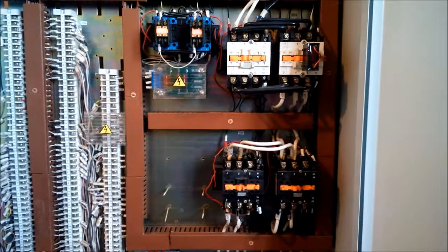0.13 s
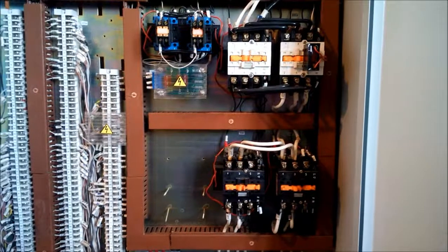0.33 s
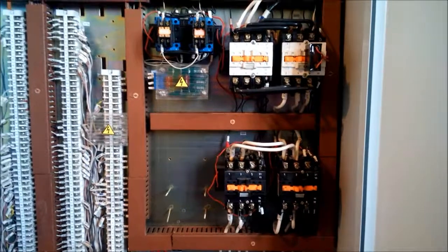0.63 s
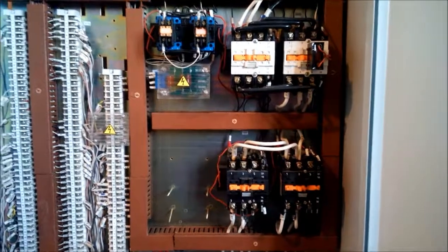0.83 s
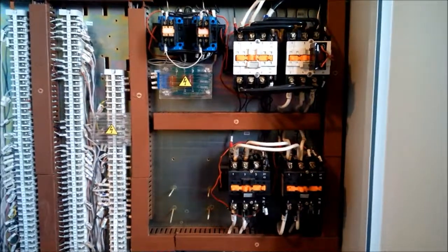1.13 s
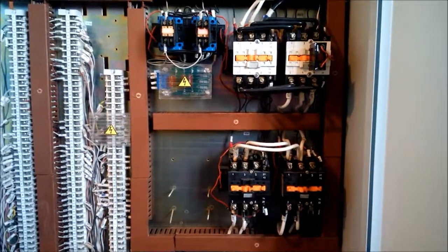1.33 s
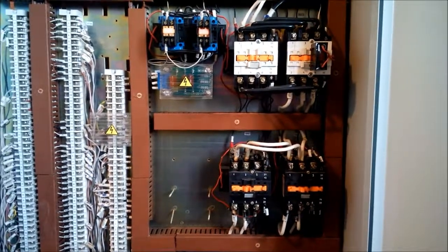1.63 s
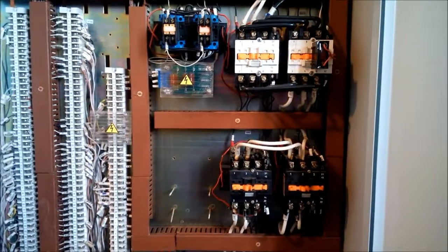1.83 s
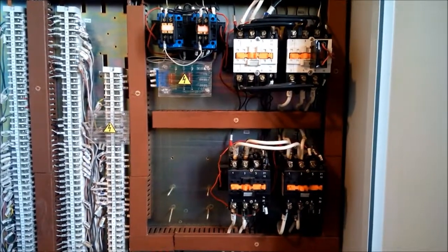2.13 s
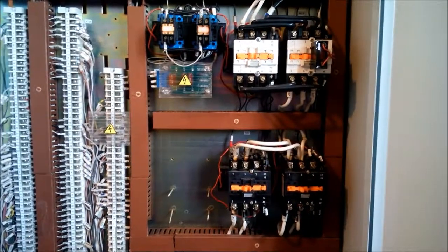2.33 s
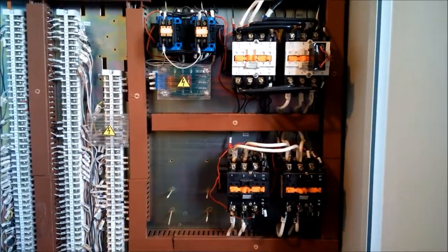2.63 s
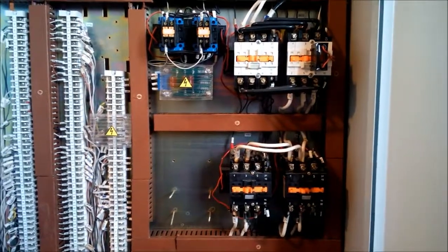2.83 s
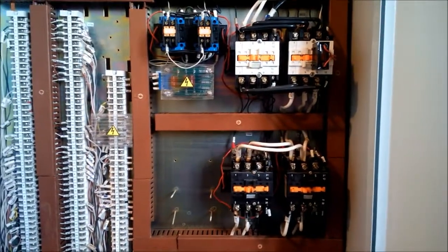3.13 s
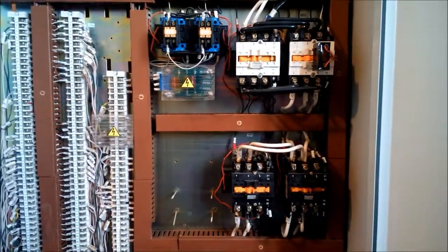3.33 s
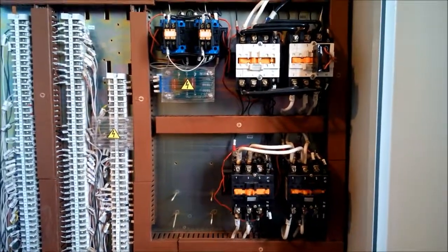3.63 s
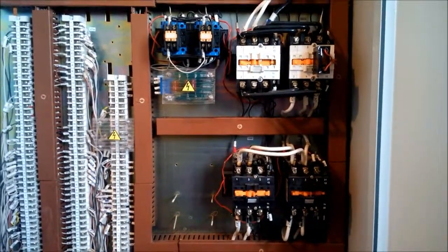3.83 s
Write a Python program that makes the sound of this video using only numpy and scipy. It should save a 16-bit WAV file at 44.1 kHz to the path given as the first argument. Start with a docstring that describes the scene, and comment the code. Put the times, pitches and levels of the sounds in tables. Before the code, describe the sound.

Contactor clacks in an electrical cabinet: one single crack, then a squeak and heavier booming slam, followed at once by ringing steel brake clatter and a growling motor, in a hard, echoing room, mono microphone.

```python
"""The last of an earlier clack's echo dies away over a wavering hum, in a bare lift machine room.
One contactor clacks in the control cabinet; a second squeaks, slams in and sets the panel booming.
The brake lifts with a ringing steel clatter, its lining rubs, and the hoist motor starts to growl.
Tones and fan noise make the hum; impulses shape noise into cracks, panel modes and wall echo;
throbbing noise drives the motor's resonances."""
import sys
import numpy as np
from scipy import signal
from scipy.fft import rfft, irfft
from scipy.io import wavfile
from scipy.ndimage import uniform_filter1d

SR = 44100
rng = np.random.default_rng(int(sys.argv[2]) if len(sys.argv) > 2 else 0)


def to_wav(s):
    """Save 16-bit WAV."""
    ch = np.atleast_2d(s).T  # columns
    pcm = np.round(np.clip(ch, -1, 1) * 32767)  # PCM
    wavfile.write(sys.argv[1], SR, pcm.astype(np.int16))


N = 176400  # samples: four seconds
T = np.arange(N) / SR  # time [s]


def undb(db):
    """Turns decibels into an amplitude factor."""
    return 10 ** (np.asarray(db) / 20)


def unit(x):
    """Scales to rms 1, for sounds that last."""
    return x / np.sqrt(np.mean(x ** 2))


def norm(x):
    """Scales to energy 1, for sounds that die away."""
    return x / np.sqrt(np.sum(x ** 2))


def noise():
    """White noise for the whole scene."""
    return rng.standard_normal(N)


def curve(rows):
    """Draws straight lines through the (t, level) rows of a table."""
    return np.interp(T, *np.array(rows).T)


def lookup(rows, hz):
    """Reads a table on a log-frequency axis."""
    f, v = np.array(rows).T
    return np.interp(np.log(np.maximum(hz, 1)), np.log(f), v)


def conv(a, b):
    """Convolves, cut to the scene's length."""
    return signal.fftconvolve(a, b)[:N]


def colour(x, rows):
    """Filters to a spectrum, with minimum phase so that nothing sounds before its blow."""
    size = 2 ** 13
    hz = np.arange(size // 2 + 1) * SR / size
    cepstrum = irfft(np.log(undb(lookup(rows, hz))))
    # Folding the cepstrum onto positive times makes the filter causal
    cepstrum[1:size // 2] *= 2
    cepstrum[size // 2 + 1:] = 0
    return conv(x, irfft(np.exp(rfft(cepstrum))))


def fade(t60):
    """Exponential decay by 60 dB in t60 seconds."""
    return np.exp(-np.log(1000) * T / t60)


def resonate(x, rows):
    """Drives parallel resonances, (f/Hz, width/Hz, level/dB), with alternating signs."""
    out = 0
    for k, (hz, width, db) in enumerate(rows):
        b, a = signal.iirpeak(hz, hz / width, fs=SR)
        out = out + (-1) ** k * undb(db) * signal.lfilter(b, a, x)
    return out


def walk(rate):
    """Slow random wander, rms 1, with a new target rate times a second."""
    k = int(SR / rate)
    steps = np.repeat(rng.standard_normal(N // k + 1), k)
    smooth = uniform_filter1d(uniform_filter1d(steps, k), k)
    return unit(smooth[:N])


def blows(rows):
    """One impulse for each blow, (t/s, level/dB)."""
    out = np.zeros(N)
    for s, db in rows:
        out[int(s * SR)] += undb(db)
    return out


def ringing(hits, t60, build_s):
    """Amplitude envelope of blows whose energies build up, add and die away."""
    keep = np.exp(-2 * np.log(1000) / (t60 * SR))
    lag = np.exp(-1 / (build_s * SR))
    energy = signal.lfilter([1], [1, -keep], hits ** 2 + 1e-20)
    return np.sqrt(signal.lfilter([1 - lag], [1, -lag], energy))


def crack(hits, spectrum, t60, rise_s=0.00093):
    """The dense, short ring of the struck parts themselves."""
    return norm(colour(noise() * ringing(hits, t60, rise_s), spectrum))


# Reverberation time of the bare room: columns f/Hz [Hz], t60/s [s]
REVERB_TIME = [(100, .9), (300, 1.85), (700, 1.3), (1500, 1.7), (2800, 1.51), (5400, 1.0), (8000, 0.79),
               (11000, 0.55), (16000, .44)]


def room(hits, build_s):
    """Diffuse echo of the hard walls: noise in bands, the treble dying before the middle."""
    spectrum = rfft(noise())
    hz = np.arange(N // 2 + 1) * SR / N
    out = 0
    for k, (_, t60) in enumerate(REVERB_TIME):
        # Each band fades into its neighbours
        band = [(row[0], float(j == k)) for j, row in enumerate(REVERB_TIME)]
        out = out + irfft(spectrum * lookup(band, hz), N) * ringing(hits, t60, build_s)
    return norm(out)


def wavering_tone(hz, drift):
    """Sine of rms 1 whose pitch wanders by the fraction drift."""
    wandering_hz = hz * (1 + drift * walk(5.98))
    return np.sqrt(2) * np.sin(2 * np.pi * np.cumsum(wandering_hz) / SR)


# Course of the hum, before its random waver: columns t/s [s], level/dB [dB]
HUM_COURSE = [(0, -38), (.33, -37), (.5, -46), (.72, -45), (1.03, -49.5), (1.19, -34.5), (1.44, -40),
              (1.62, -36), (1.69, -40.5), (1.745, -58), (1.8, -42.5), (1.9, -33.5), (2.15, -36), (2.4, -33),
              (2.9, -34), (3.2, -37), (3.29, -40), (3.8, -45), (4, -29)]
# Relative spectrum of the fan noise: columns f/Hz [Hz], level/dB [dB per Hz]
FAN_SPECTRUM = [(25, -47), (35, -9.5), (44, -14), (60, -24), (90, -6), (160, -1.5), (270, -2.5),
                (400, -4.5), (520, -13), (700, -20), (1200, -27.5), (2500, -33.5), (6000, -37.5),
                (11000, -38), (12000, -41), (15800, -39.5)]


def machinery():
    """Background: two low tones and a fluttering narrow band waver over steady fan noise."""
    hum_hz, shaft_hz = 113.46, 68.7
    shaft_db, flutter_db, fan_db = -49, -45.5, -49
    hum = wavering_tone(hum_hz, drift=0.0049) * undb(curve(HUM_COURSE) + 1.9 * walk(7.1))
    shaft = wavering_tone(shaft_hz, drift=0.0045) * undb(shaft_db + 0.93 * walk(1.1))
    band = [(115.2, 31, 0)]  # f/Hz, width/Hz, level/dB
    flutter = unit(resonate(resonate(noise(), band), band))
    fan = unit(colour(noise(), FAN_SPECTRUM))
    return hum + shaft + undb(flutter_db) * flutter + undb(fan_db) * fan


# Relative spectrum of the earlier clack's echo: columns f/Hz [Hz], level/dB [dB per Hz]
OLD_ECHO_SPECTRUM = [(150, -7), (400, 0), (1000, -6), (1600, -9), (3000, -18), (5500, -18), (8000, -29),
                     (15800, -44)]


def dying_echo(echo_db=-18.5):
    """The last of an earlier clack's echo fades off the walls at the start."""
    echo = room(blows([(0, 0)]), build_s=.001)
    return undb(echo_db) * norm(colour(echo, OLD_ECHO_SPECTRUM))


# Resonances of the motor and its bed: columns f/Hz [Hz], width/Hz [Hz], level/dB [dB]
MOTOR_MODES = [(166, 20, -3.5), (193.4, 7.7, 6), (258.6, 33, -2.5), (279.8, 7.9, 6), (326.6, 10, 3),
               (379.6, 12, -1), (450, 29, -0.5), (518, 25, -4)]
# Relative spectrum of the force that drives them: columns f/Hz [Hz], level/dB [dB per Hz]
DRIVE_SPECTRUM = [(50, -25.5), (150, 0), (520, 0.5), (1200, -13.5), (5000, -30)]
# Relative course of the growl: columns t/s [s], level/dB [dB]
EFFORT_COURSE = [(3.35, -64), (3.52, -1), (3.66, -6), (3.78, 3.5), (3.9, 3.5), (4, 4)]
# Relative spectrum of the rush of gears: columns f/Hz [Hz], level/dB [dB per Hz]
RUSH_SPECTRUM = [(30, -10), (60, -16), (200, -8), (450, -3.5), (750, -3), (1000, -6.5), (1600, -10.5),
                 (2300, -20), (4500, -19.5), (10500, -23.5), (12000, -35), (15800, -39)]


def motor(growl_db=-28, rush_db=-34.0, throb_db=3, rush_fall_db_per_s=5):
    """The starting motor throbs through its bed and brightens, with a smooth rush of gears."""
    throb_hz, split_hz = 43.25, 400
    brighten_db_per_s, pivot_s = 33.5, 3.99  # no gain or loss at the pivot
    gears_start_s, gears_rise_s = 3.48, 0.092

    throb_phase = 2 * np.pi * np.cumsum(throb_hz * (1 + 0.0416 * walk(15))) / SR
    throb = undb(throb_db * np.cos(throb_phase))
    drive = colour(noise() * throb, DRIVE_SPECTRUM)
    low = resonate(drive, [row for row in MOTOR_MODES if row[0] < split_hz])
    high = resonate(drive, [row for row in MOTOR_MODES if row[0] >= split_hz])
    # The upper resonances gain as the motor gathers speed
    brightening = undb(brighten_db_per_s * (T - pivot_s))
    growl = (low + high * brightening) / np.std(low + high) * undb(curve(EFFORT_COURSE))

    gears_in = np.clip((T - gears_start_s) / gears_rise_s, 0, 1)
    running = gears_in * undb(-rush_fall_db_per_s * (T - pivot_s))
    rush = running * unit(colour(noise(), RUSH_SPECTRUM))
    return undb(growl_db) * growl + undb(rush_db) * rush


# The rub until the lining clears the drum, before its flicker: columns t/s [s], level/dB [dB]
RUB_COURSE = [(3.5, -90), (3.62, -58), (3.76, -34.5), (3.86, -42.5), (4, -56)]
# Resonances that the rubbing excites: columns f/Hz [Hz], width/Hz [Hz], level/dB [dB]
RUBBED_MODES = [(1550, 270, 2), (3370, 55, -10), (6000, 210, -3), (7100, 120, -1), (9570, 47, -6),
                (10500, 260, -9.5)]


def lining():
    """The lining drags on the turning drum: noise keeps the steel singing."""
    return unit(resonate(noise(), RUBBED_MODES)) * undb(curve(RUB_COURSE) + 1.7 * walk(40))


# Blows of the brake's steel parts: columns t/s [s], level/dB [dB]
CLATTER_BLOWS = [(3.4738, 3.5), (3.4768, 4), (3.4805, -10), (3.487, 2), (3.4915, -8), (3.498, -2),
                 (3.5045, 0), (3.516, -10), (3.524, -2), (3.55, -9), (3.587, -21)]
# Relative spectrum of their direct crack: columns f/Hz [Hz], level/dB [dB per Hz]
CLATTER_CRACK = [(100, -15), (300, 6.5), (900, -15.5), (1300, -3), (1600, 5.5), (2200, -8.5), (3200, -9),
                 (4200, -13), (5800, -4.5), (7000, -11.5), (9400, 1), (10800, -6.5), (12000, -21),
                 (15800, -19)]
# Relative spectrum of their echo: columns f/Hz [Hz], level/dB [dB per Hz]
CLATTER_ECHO = [(100, -23), (170, 0.5), (300, -0.5), (420, -7.5), (600, -9.5), (900, -9), (1200, -5),
                (1650, -9), (2200, -11.5), (3200, -14.5), (4200, -15.5), (5800, -13), (7000, -14),
                (9400, -6), (10800, -13.5), (12000, -22), (15800, -26)]
# Resonances of the brake's steel: columns f/Hz [Hz], width/Hz [Hz], level/dB [dB]
STEEL_MODES = [(892, 43, -4.5), (1490, 125, -4), (1697, 97, -1.5), (3310, 45, -8), (4860, 43, -8),
               (5860, 180, -4), (7040, 42, -11), (7900, 260, -11), (9430, 76, 1.5), (10700, 150, -19)]
# The brake arms reach their stops: columns t/s [s], level/dB [dB]
ARM_STOPS = [(3.506, -2.5), (3.525, -5), (3.551, -3.5), (3.571, -9), (3.615, -3.5)]
# Relative spectrum of those thuds: columns f/Hz [Hz], level/dB [dB per Hz]
THUD_SPECTRUM = [(30, -10), (70, -12), (180, 6), (300, 5.5), (450, 4.5), (650, 0.5), (1000, -6.5),
                 (1500, -2), (2500, -9), (6000, -47), (15800, -52)]


def brake(crack_db=13, clatter_db=15.5, ring_db=13.0, thud_db=8.0):
    """Steel parts clatter and thud across the room, and ring on in its echo."""
    hits = blows(CLATTER_BLOWS)
    direct = crack(hits, CLATTER_CRACK, t60=0.099)
    thuds = crack(blows(ARM_STOPS), THUD_SPECTRUM, t60=0.085)
    clatter = norm(colour(room(hits, build_s=0.0034), CLATTER_ECHO))
    ring = norm(resonate(room(hits, build_s=0.0017), STEEL_MODES))
    near = undb(crack_db) * direct + undb(thud_db) * thuds
    return near + undb(clatter_db) * clatter + undb(ring_db) * ring


# The armature catches as it slides in: columns t/s [s], level/dB [dB]
CATCHES = [(3.302, -7), (3.3155, -5)]
# Resonance of the squeak: columns f/Hz [Hz], width/Hz [Hz], level/dB [dB]
SQUEAK_MODE = [(1530, 130, 0)]
# Relative spectrum of the scrape: columns f/Hz [Hz], level/dB [dB per Hz]
SCRAPE_SPECTRUM = [(300, -9), (2000, -6), (10000, -4), (13000, -11)]


def armature(squeak_db=-3, scrape_db=-12):
    """A short squeak and scrape of noise as the main contactor's armature slides in."""
    slide = ringing(blows(CATCHES), t60=.06, build_s=0.0035)
    squeak = resonate(resonate(noise(), SQUEAK_MODE), SQUEAK_MODE) * slide
    scrape = colour(noise() * slide, SCRAPE_SPECTRUM)
    return undb(squeak_db) * norm(squeak) + undb(scrape_db) * norm(scrape)


# Modes of the cabinet panel and frame: columns f/Hz [Hz], level/dB [dB], t60/s [s]
PANEL_MODES = [(194, -0.5, 0.79), (235, -19, 1), (339, -17, 1), (366.7, -16.5, .6), (407, -20, .5),
               (473, -19, 1), (1640, -15.5, 0.4), (3332, -20, 0.83)]


def contactor(rows, spectrum, echo, crack_t60, crack_db, room_db, panel_db):
    """Each blow cracks in the plastic housing; the hardest rings the panel; the room answers."""
    hits = blows(rows)
    direct = crack(hits, spectrum, crack_t60)
    walls = norm(colour(room(hits, build_s=.003), echo))
    modes = sum(undb(db) * np.sin(2 * np.pi * hz * T) * fade(t60) for hz, db, t60 in PANEL_MODES)
    panel = modes * (1 - np.exp(-T / 0.0046))  # soft onset, time constant in s
    hardest = max(rows, key=lambda row: row[1])
    boom = norm(conv(blows([hardest]), panel))
    return undb(crack_db) * direct + undb(room_db) * walls + undb(panel_db) * boom


# Blows of the first contactor: columns t/s [s], level/dB [dB]
FIRST_HITS = [(2.4617, -24), (2.468, -2), (2.4692, 4), (2.4712, -6)]
# Relative spectrum of its direct crack: columns f/Hz [Hz], level/dB [dB per Hz]
FIRST_DIRECT = [(80, -19), (180, 6), (474, -4), (866, -8.5), (1500, -8.5), (3000, -6), (4040, -2),
                (5200, -0.5), (7390, -6.5), (8810, 1.5), (10600, -2.5), (11900, -19), (15800, -26.5)]
# Relative spectrum of its echo: columns f/Hz [Hz], level/dB [dB per Hz]
FIRST_ECHO = [(100, -24.5), (190, 14), (290, 5), (460, 6.5), (560, -1), (680, -0.5), (800, -2.5),
              (1150, -3), (1600, -3), (1950, 0), (2200, -0.5), (2450, -8), (2780, 2), (3250, -3.5),
              (3580, -1), (3850, -3), (4300, -0.5), (5500, 2.5), (7000, 0), (8810, 4), (10800, 0),
              (12000, -10), (15800, -23)]


def first_contactor():
    """A single clack: a tight cluster of blows with a short crack."""
    return contactor(FIRST_HITS, FIRST_DIRECT, FIRST_ECHO,
                     crack_t60=.018, crack_db=9.0, room_db=9, panel_db=4.5)


# Blows of the main contactor, as contacts touch, armature lands and rebounds:
# columns t/s [s], level/dB [dB]
MAIN_HITS = [(3.3165, -21), (3.3221, -9), (3.3259, 1), (3.3283, -1), (3.3360, -3), (3.3377, 0),
             (3.3412, -9)]
# Relative spectrum of its direct crack: columns f/Hz [Hz], level/dB [dB per Hz]
MAIN_DIRECT = [(80, -32.5), (180, -9), (300, -21), (647, -24.5), (880, -8), (1250, -16.5), (1500, -20),
               (2300, -8), (4630, -14.5), (5740, -9.5), (8980, -17), (10500, -11), (12000, -21),
               (15800, -29)]
# Relative spectrum of its echo: columns f/Hz [Hz], level/dB [dB per Hz]
MAIN_ECHO = [(100, -20), (170, -19), (260, -8), (330, -2), (460, -6.5), (540, -15.5), (800, -16),
             (1050, -12.5), (1400, -18), (1620, -14.5), (1950, -11), (2600, -12), (3200, -12),
             (4200, -16.5), (5460, -15), (8000, -10.5), (10500, -10), (12000, -22), (15800, -29)]


def main_contactor():
    """The heavier slam, with a stronger panel boom and echo."""
    return contactor(MAIN_HITS, MAIN_DIRECT, MAIN_ECHO,
                     crack_t60=.023, crack_db=12.0, room_db=14.5, panel_db=15.5)


def scene():
    """Sums the machine room, from the background to the cabinet, in one channel."""
    background = machinery() + dying_echo()
    hoist = motor() + lining() + brake()
    cabinet = armature() + first_contactor() + main_contactor()
    return (background + hoist + cabinet)[None]


def record(dry):
    """The microphone's recorder rounds the loudest peaks and cuts the top."""
    ceiling, top_hz = .7, 15850  # full-scale fraction; Hz
    rounded = dry / (1 + (dry / ceiling) ** 4) ** (1 / 4)
    low_pass = signal.ellip(10, .2, 70, top_hz, fs=SR, output="sos")
    return signal.sosfilt(low_pass, rounded)


dry = scene()
out = record(dry)
to_wav(out)
```